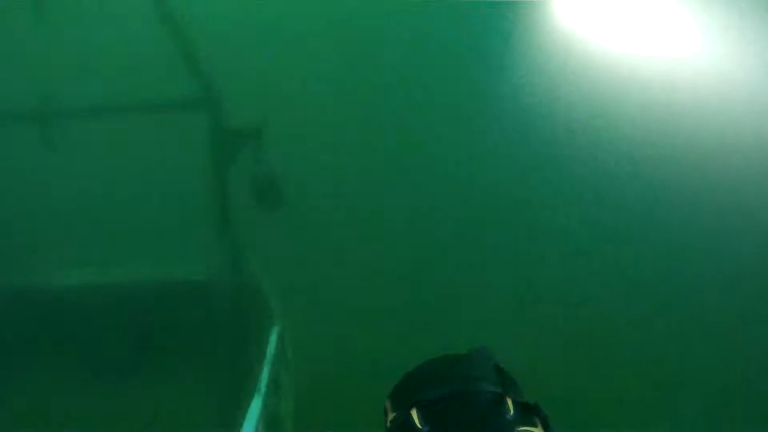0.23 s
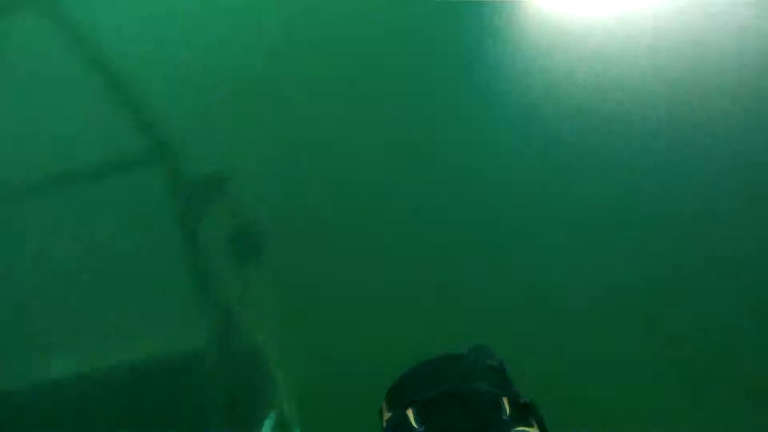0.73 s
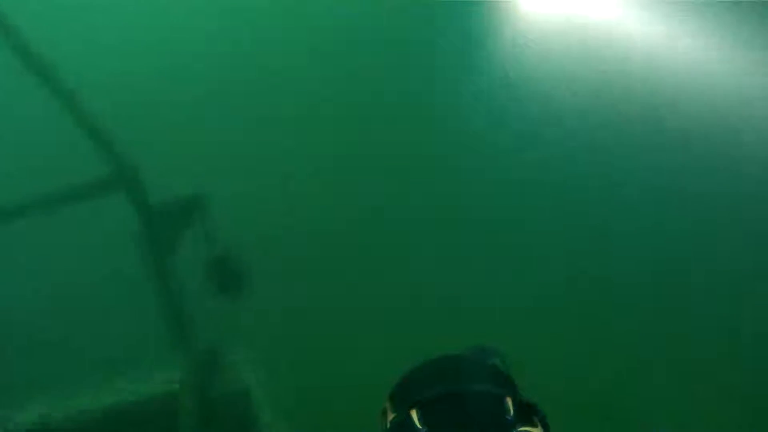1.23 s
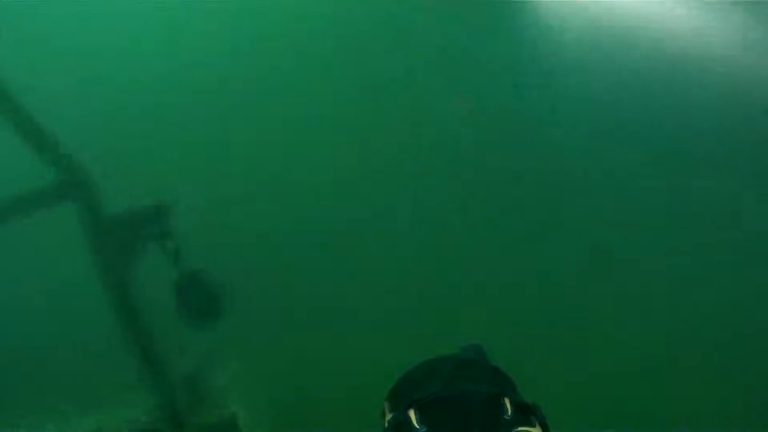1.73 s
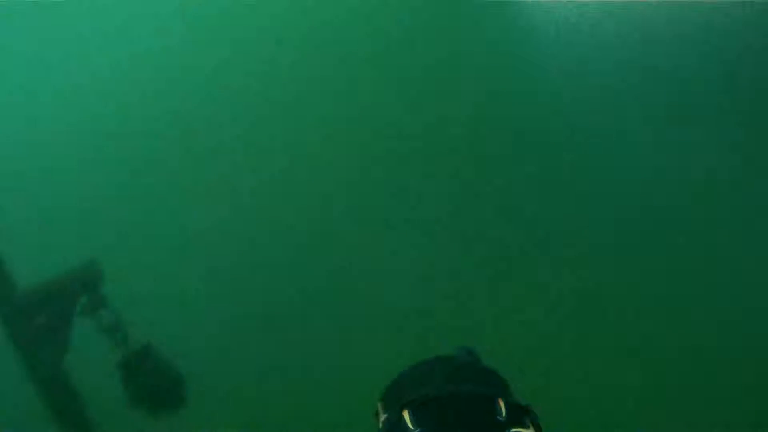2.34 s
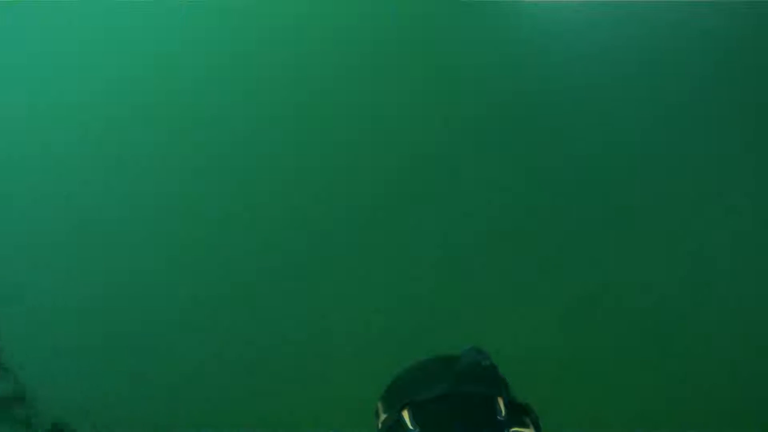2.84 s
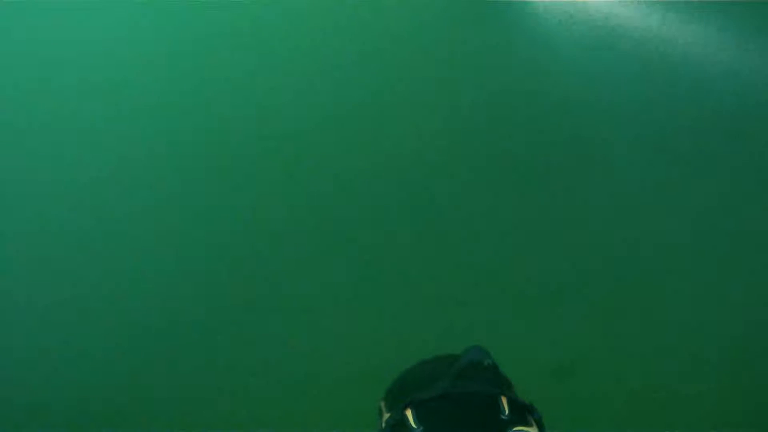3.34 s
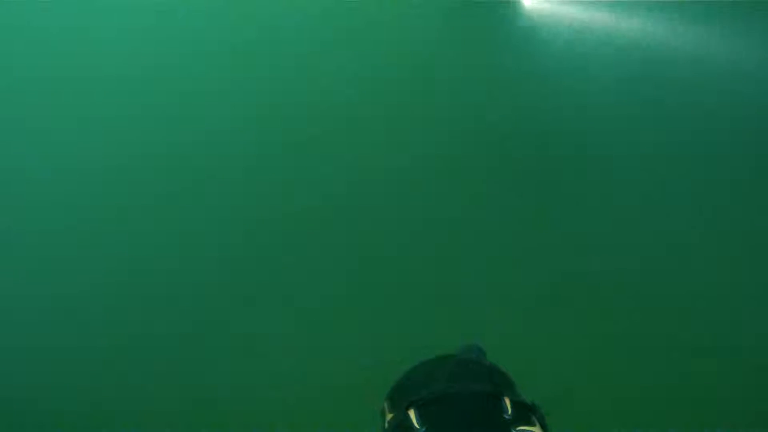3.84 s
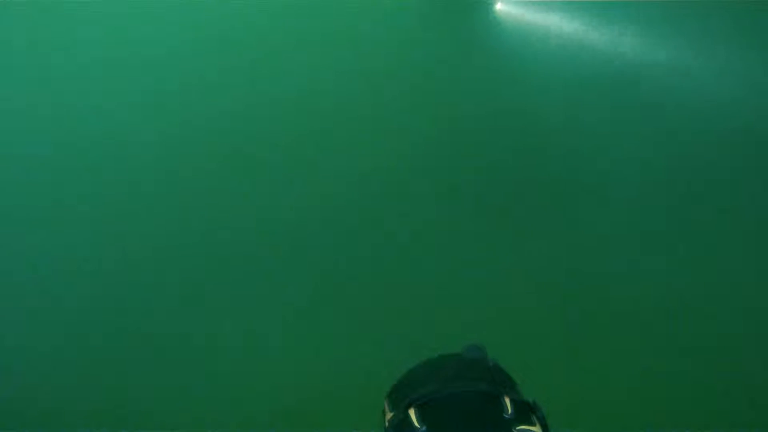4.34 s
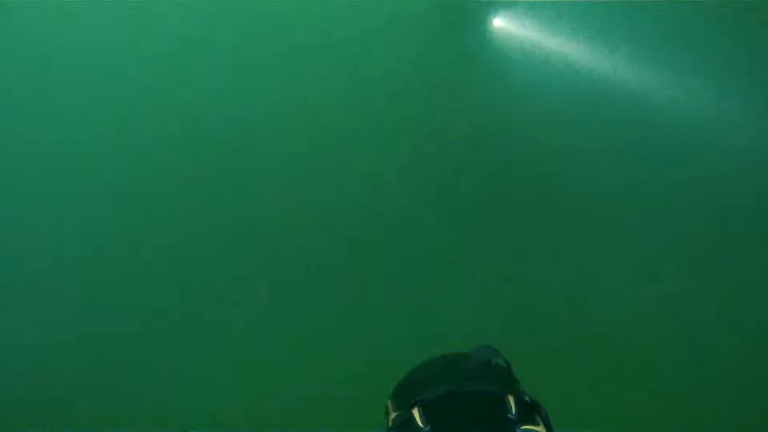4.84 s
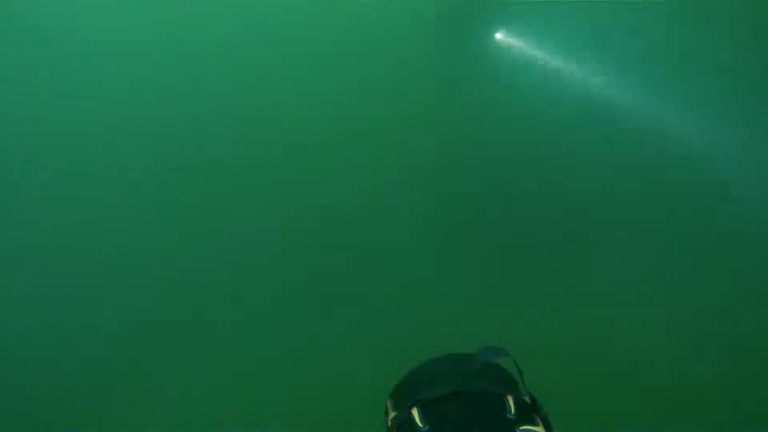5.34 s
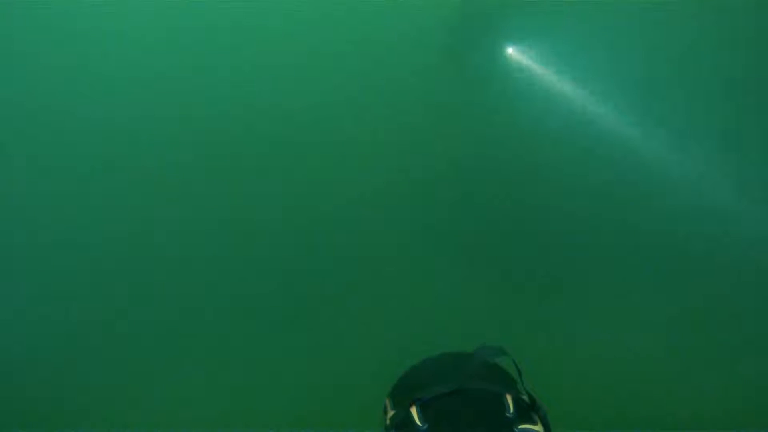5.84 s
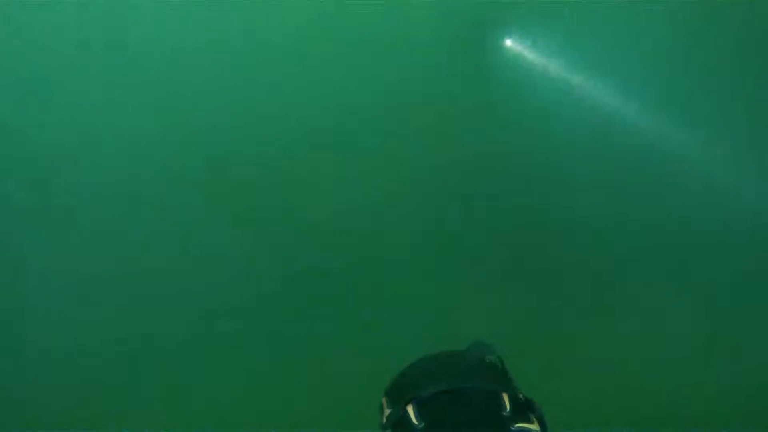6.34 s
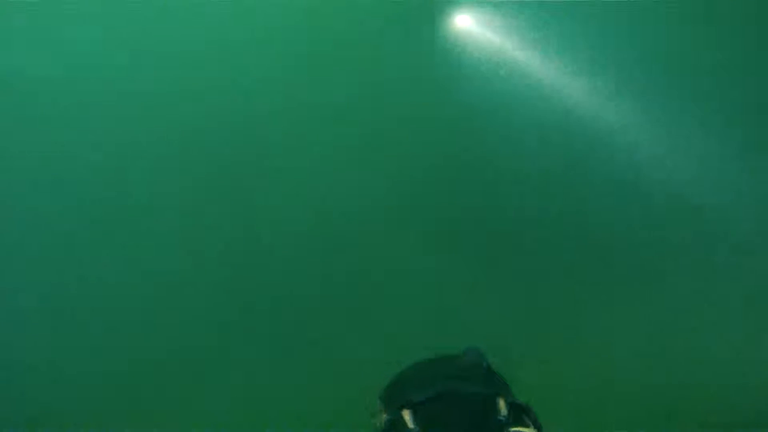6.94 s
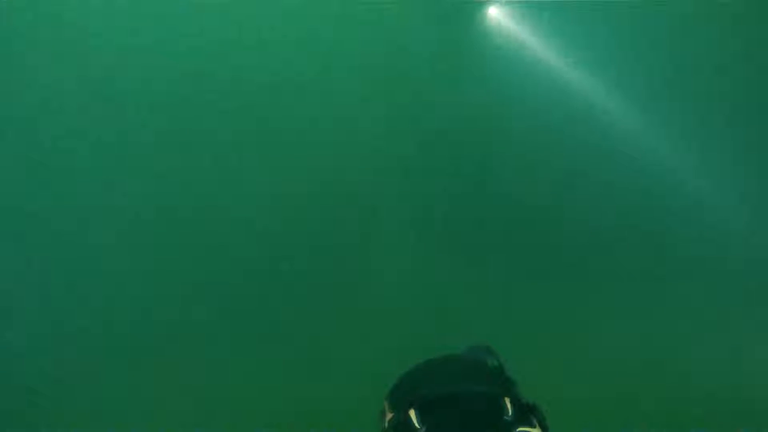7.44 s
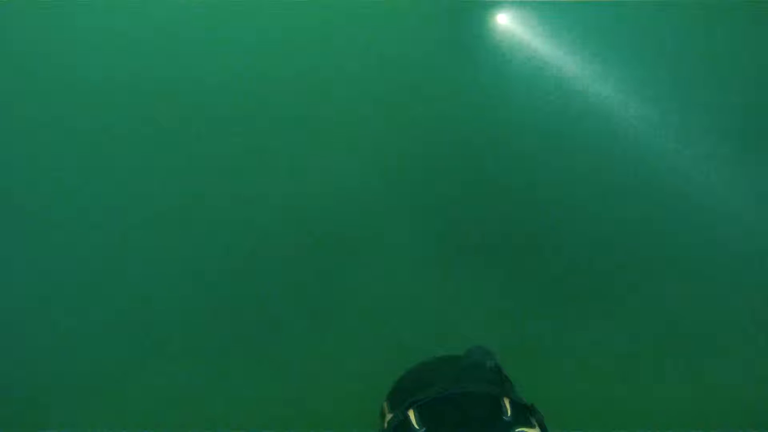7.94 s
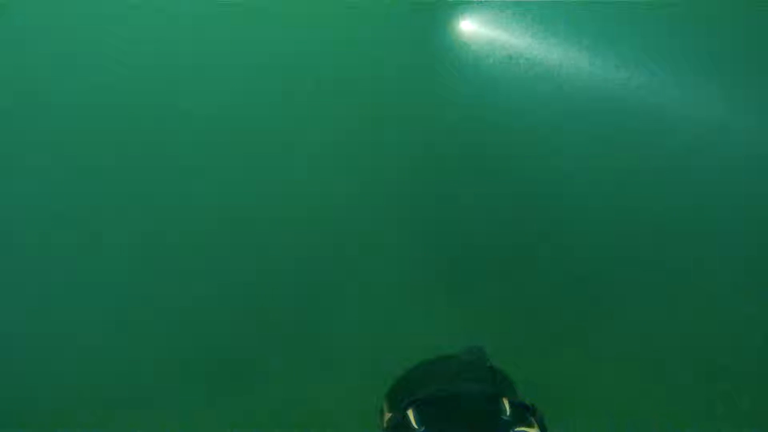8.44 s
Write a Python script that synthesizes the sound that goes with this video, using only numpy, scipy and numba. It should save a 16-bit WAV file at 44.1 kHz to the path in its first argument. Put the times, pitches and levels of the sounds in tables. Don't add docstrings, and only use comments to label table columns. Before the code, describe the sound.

Underwater, a diver's electric scooter runs without pause: a rough low hum and propeller beat under a thin, fluttering gear whine. Turbulent water rumbles against the sealed camera housing, with irregular dull surges each making the level duck briefly. A few short knocks and gurgles ring the shell, the strongest near seven seconds. Close, boxy, muffled and gritty, with faint metallic digital treble.

```python
import sys
import numpy as np
from scipy import signal
from scipy.fft import rfft, irfft, next_fast_len
from scipy.io import wavfile
from numba import njit

SR = 44100
rng = np.random.default_rng(int(sys.argv[2]) if len(sys.argv) > 2 else 0)


def gain_from_decibels(decibels):
    exponent = np.asarray(decibels, float) / 20
    return 10 ** exponent


def file_out(sig):
    cols = np.atleast_2d(sig).T
    lim = np.clip(cols, -1, 1)
    pcm = np.round(lim * 32767).astype(np.int16)
    wavfile.write(sys.argv[1], SR, pcm)


N = 383229
SAMPLE_HZ = 12000

# shaft_multiple, level_db_rms, wander_db
SHAFT_ORDERS = [(1, -36, -7.5), (2, -45.5, 6.5), (3, -24.5, 1.5), (4, -30.5, 2), (5, -35, -1.5),
                (7, -49, 7), (12, -60.5, -5), (16, -47, -5.5)]
# time_s, orders_from_ninth
BLADE_LOAD = [(0.0, -.9), (.8, -.9), (1.0, .5), (1.6, .3), (1.95, -.7), (2.4, -.5), (3.0, -.2), (3.35, .4),
              (3.7, -.1), (4.15, .8), (4.5, -.3), (4.9, .4), (5.6, .7), (6.1, -.7), (6.9, -.9), (7.75, -.6),
              (8.0, .5), (8.3, -.8)]
# time_s, grip_db
GEAR_GRIP = [(0.0, 3.5), (.2, -3.2), (.45, 3), (1.0, -1.5), (1.3, 1), (1.95, -1.7), (2.45, -2), (3.0, -3.5),
             (3.645, 4), (3.66, -14), (3.8, 1), (3.83, -13), (4.15, -13.5), (4.5, -6.5), (5.0, -6.5),
             (5.3, 1.5), (6.3, 3), (8.69, 1)]
MESH_SIDEBANDS = [(-12, -56), (-8, -61), (-4, -57), (-1, -62), (1, -63), (4, -54), (12, -64), (16, -66)]
# pitch_hz, level_db_rms
PROPELLER_TONES = [(55.2, -29), (86.8, -46), (165.9, -31), (676.6, -62), (732.1, -59), (1070.3, -56),
                   (1464.3, -58), (1652.0, -67), (2368.7, -83), (3045.3, -74), (3383.7, -77.5)]
# peak_s, peak_db, pitch_hz, gain_drop_db
SURGES = [(0.0251, -4.5, 156, 7.2), (0.3967, -6.7, 247, 2.4), (0.6302, -3.1, 99, 2.4),
          (1.0725, -4.5, 110, 3.0), (1.3284, -4.3, 148, 3.0), (1.713, -6.4, 128, 2.6),
          (1.876, -2.5, 218, 5.7), (2.2134, -5.9, 146, 5.1), (2.4608, -4.0, 90, 3.2),
          (2.824, -6.0, 93, 0.5), (3.0251, -2.6, 135, 7.4), (3.4751, -4.3, 113, 3.8),
          (3.8737, -3.1, 175, 2.3), (4.1928, -4.5, 101, 5.8), (4.3697, -7.1, 119, 1.8),
          (4.6328, -3.2, 138, 6.5), (5.0322, -7.7, 90, 0.5), (5.2872, -3.7, 138, 1.7),
          (5.4209, -6.6, 185, 0.5), (5.6404, -6.8, 91, 1.9), (5.8616, -6.6, 87, 3.0),
          (6.111, -2.9, 162, 6.9), (6.7416, -6.4, 183, 0.5), (6.8391, -5.0, 111, 2.4),
          (6.9853, -0.6, 212, 6.5), (7.2956, -5.5, 218, 2.4), (7.4973, -6.7, 146, 2.0),
          (8.0377, -4.3, 103, 3.8), (8.2428, -5.7, 234, 0.5), (8.4911, -4.3, 196, 6.1)]
# start_s, peak_db, ring_hz, t60_s, crack_db
KNOCKS_ON_SHELL = [(.0003, -40, 1400, .01, -36), (.2240, -28, 740, .03, -70), (.2285, -31, 950, .025, -70),
                   (.822, -30, 720, .03, -70), (.830, -27, 520, .04, -70), (2.1415, -26, 1000, .006, -23),
                   (3.630, -25, 560, .04, -70), (3.66, -29, 600, .03, -70), (3.812, -36, 1280, .025, -70),
                   (3.85, -35, 1050, .03, -70), (5.517, -21, 760, .03, -65), (5.522, -29, 1050, .02, -70),
                   (5.527, -24, 620, .03, -70), (1.103, -47, 2300, .04, -80),
                   (6.9802, -25, 3050, .007, -33), (6.9810, -15, 1300, .009, -60),
                   (6.982, -24, 750, .012, -60)]
# freq_hz, density_db_per_hz
FLOW_SPECTRUM = [(12, -30), (26, -14), (36, -3), (150, 0), (200, -6), (320, -8), (400, -26), (600, -28),
                 (920, -42), (1300, -35), (2050, -45), (2700, -55), (3330, -54), (3450, -70), (6000, -80)]
# pitch_hz, width_hz, level_db_rms
HOUSING_MODES = [(175.3, 47, -30.5), (251.2, 15, -29.5), (276.4, 17.2, -25.5), (314.1, 8.7, -32.5),
                 (510.2, 22, -40), (562.7, 14, -47), (752.6, 49, -46.5), (1047.7, 42, -47),
                 (1454, 70, -47.5), (1540, 110, -54), (1873, 47, -59), (1926, 30, -58), (3090, 220, -66.5)]


def rms_one(x):
    return x / np.sqrt(np.mean(x ** 2) + 1e-20)


def curve(rows):
    time_s, value = np.transpose(rows)
    return np.interp(np.arange(N) / SR, time_s, value)


def drift(rate_hz):
    r = np.exp(-80 * np.pi * rate_hz / SR)
    slow = signal.lfilter([1], [1, -2 * r, r * r], rng.standard_normal(N // 40 + 2002))
    slow = slow[2000:]
    slow = rms_one(slow - slow.mean())
    return np.interp(np.arange(N) / 40, np.arange(len(slow)), slow)


def tone(turns, level_db, wander_db):
    level = np.sqrt(2) * gain_from_decibels(level_db + wander_db * drift(2.93))
    return level * np.sin(2 * np.pi * (turns + rng.random()))


def ring(x, hz, width_hz):
    r = np.exp(-np.pi * width_hz / SR)
    w = 2 * np.pi * hz / SR
    return signal.lfilter([0, np.sin(w)], [1, -2 * r * np.cos(w), r * r], x + 1e-18)


def shaft_orders(shaft_turns):
    out = sum(tone(k * shaft_turns, db, wander_db) for k, db, wander_db in SHAFT_ORDERS)
    favoured = curve(BLADE_LOAD)
    for order, favoured_db in ((8, -22), (9, -28.5), (10, -24)):
        level_db = favoured_db - 3 * (order - 9 - favoured) ** 2
        out += tone(order * shaft_turns, level_db, 2.5)
    return out


def gear_whine(shaft_turns):
    jolt_s, jolt_db, recover_s = 7.0, 9.5, 0.09
    since_s = np.arange(N) / SR - jolt_s
    grip_db = curve(GEAR_GRIP) - jolt_db * (since_s > 0) * np.exp(-(since_s / recover_s) ** 2)
    grip_db = grip_db + 0.35 * np.minimum(grip_db, 0) * drift(27.0)
    mesh_turns = np.cumsum(1408.7 * (1 + 0.0012 * drift(8.0))) / SR
    shake_db = 1.5 * drift(7.9)
    second_db = -52.5 - 0.12 * grip_db + shake_db
    grip_db = grip_db + shake_db
    out = tone(mesh_turns, -37.5 + grip_db, 1.0)
    out += tone(2 * mesh_turns, second_db, 0.9)
    out += tone(3 * mesh_turns, -68 + 0.4 * grip_db, 1.2)
    for k, db in MESH_SIDEBANDS:
        out += tone(mesh_turns + k * shaft_turns, db - 1.5 + 3 * drift(14.0), 4.4)
    return out


def propeller_tones():
    steady_s = np.cumsum(1 + 0.00098 * drift(2.8)) / SR
    return sum(tone(hz * steady_s, db, 3.0) for hz, db in PROPELLER_TONES)


def motor():
    shaft_turns = np.cumsum(31.75 * (1 + 0.004125 * drift(5.45))) / SR
    return shaft_orders(shaft_turns) + gear_whine(shaft_turns) + propeller_tones()


def surges(hum, cycles, share):
    out = hum.copy()
    rumble = signal.sosfiltfilt(signal.butter(2, 400, fs=SR, output="sos"), hum)
    for peak_s, db, hz, _ in SURGES:
        at = np.arange(max(round((peak_s - 0.03) * SR), 0), round((peak_s + 0.03) * SR))
        turns = (at / SR - peak_s) * hz
        bell = np.exp(-(turns / cycles) ** 2)
        sign = np.sign(bell @ rumble[at])
        swing = sign * gain_from_decibels(db - 1.0) * np.cos(2 * np.pi * turns)
        out[at] += bell * (swing - share * rumble[at])
    return out


def knocks():
    out = np.zeros(N + SR)
    click = np.append(1.0, np.zeros(SR // 5))
    for start_s, db, hz, t60_s, crack_db in KNOCKS_ON_SHELL:
        width_hz = np.log(1000) / (np.pi * t60_s)
        softened = ring(ring(click, hz, width_hz), hz, 4 * width_hz)
        tap = gain_from_decibels(db) * softened * 16 * np.pi * width_hz / SR
        crack = gain_from_decibels(crack_db + 20) * signal.lfilter([0.3], [1, -0.7], click)
        out[round(start_s * SR):][:len(click)] += tap + crack
    return out[:N]


def turbulence(lumps_db, patchy_db):
    size = next_fast_len(N)
    log_hz = np.log(np.arange(size // 2 + 1) * SR / size + 1)
    flow_hz, flow_db = np.transpose(FLOW_SPECTRUM)
    noise = rfft(rng.standard_normal(size)) * gain_from_decibels(np.interp(log_hz, np.log(flow_hz), flow_db))
    centres_hz = 30 * 2.0 ** np.arange(9)
    out = np.zeros(N)
    for centre_hz, share in zip(centres_hz, np.eye(9)):
        patch = np.interp(log_hz, np.log(centres_hz), share)
        level_db = lumps_db * (centre_hz < 700) + patchy_db * drift(19.0)
        out += irfft(noise * patch, size)[:N] * gain_from_decibels(level_db)
    return gain_from_decibels(-20) * rms_one(out)


def shell_ringing(lumps_db):
    white = rng.standard_normal(N) * gain_from_decibels(0.79 * lumps_db)
    out = np.zeros(N)
    for hz, width_hz, db in HOUSING_MODES:
        pole_hz = 1.57 * width_hz
        out += gain_from_decibels(db) * rms_one(ring(ring(white, hz, pole_hz), hz, pole_hz))
    return out


def flow(patchy_db):
    lumps_db = 2 * drift(7.0)
    return turbulence(lumps_db, patchy_db) + shell_ringing(lumps_db)


def scene():
    hum = motor() + flow(patchy_db=2.0)
    return (surges(hum, cycles=0.68, share=0.9) + knocks())[None]


@njit
def stepped_gain(x, drops_db, ticks, rise_db, step_db, top):
    out, wanted_db, used_db = x.copy(), 0.0, 0.0
    for i in range(len(x)):
        wanted_db = min(wanted_db + rise_db, 0.0) - drops_db[i]
        if ticks[i]:
            wanted_db -= step_db * (abs(x[i]) * 10 ** (used_db / 20) > top)
            used_db += step_db * np.sign(np.round((wanted_db - used_db) / step_db))
        out[i] = x[i] * 10 ** (used_db / 20)
    return out


def roll_off(x):
    return signal.sosfilt(signal.butter(12, 15240, fs=SR, output="sos"), x)


def record(dry):
    x = signal.resample_poly(dry[0], 40, 147)
    drops_db = np.zeros(len(x))
    surge_at = [round((row[0] - 0.0002) * SAMPLE_HZ) for row in SURGES]
    drops_db[surge_at] = 0.85 * np.array(SURGES)[:, 3]
    ticks = rng.random(len(x)) < 2000 / SAMPLE_HZ
    x = stepped_gain(x, drops_db, ticks, 36.0 / SAMPLE_HZ, 0.7, 0.9)
    x = x + gain_from_decibels(-39.5) * x * np.abs(x) ** 0.39 * rng.standard_normal(len(x))
    x = x / (1 + (x / 0.97) ** 8) ** (1 / 8)
    x = (x + 0.85 * np.append(x[1:], 0)) / 1.85
    held = signal.resample_poly(np.repeat(x, 4), 147, 160)[None, :N]
    return roll_off(held)


dry = scene()
out = record(dry)
file_out(out)
```